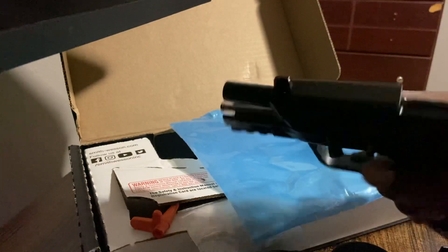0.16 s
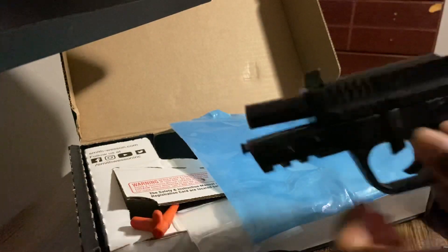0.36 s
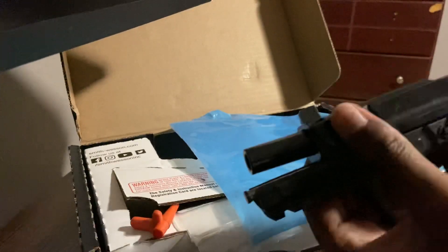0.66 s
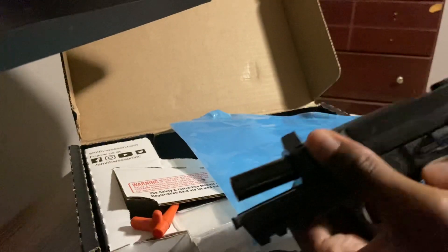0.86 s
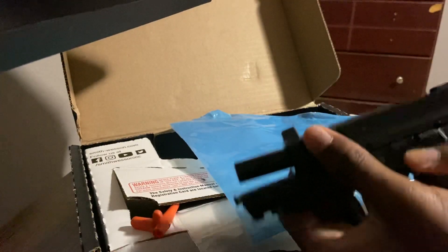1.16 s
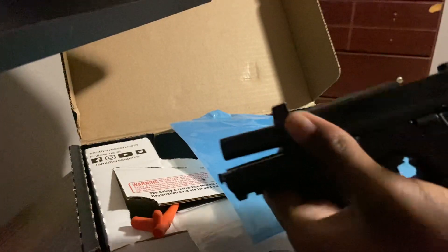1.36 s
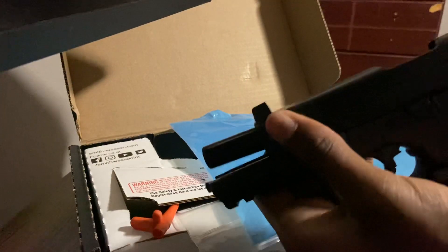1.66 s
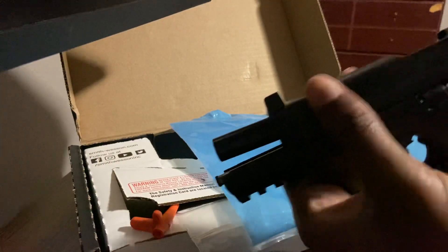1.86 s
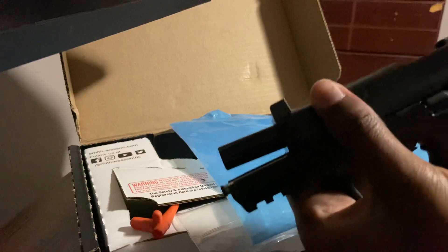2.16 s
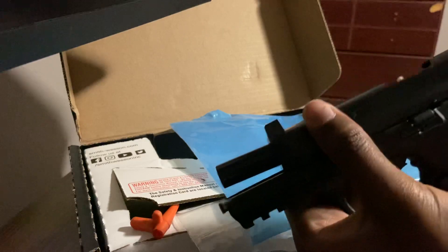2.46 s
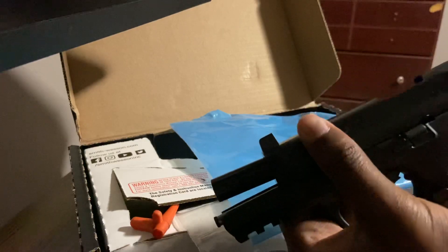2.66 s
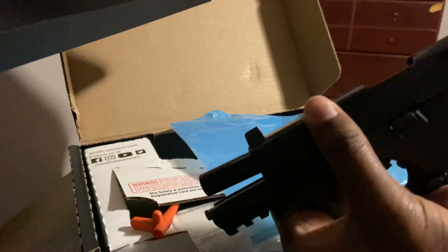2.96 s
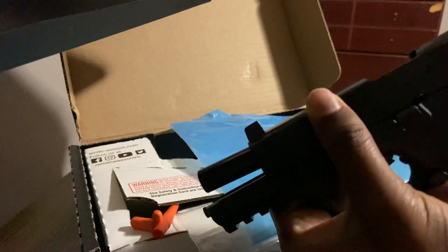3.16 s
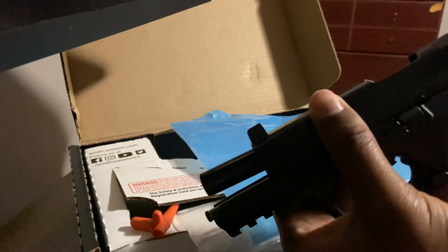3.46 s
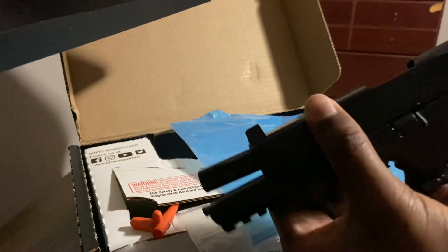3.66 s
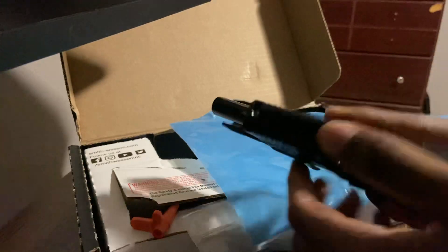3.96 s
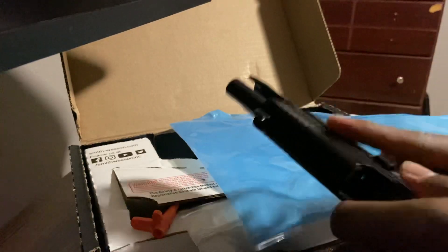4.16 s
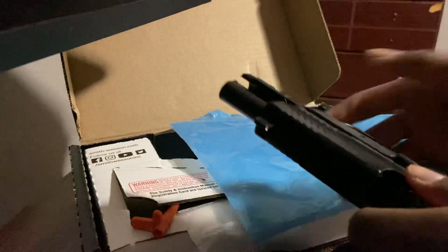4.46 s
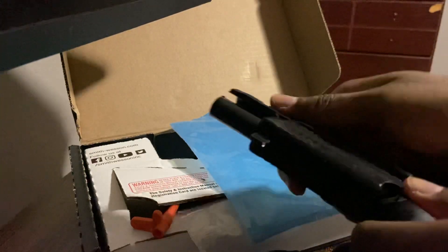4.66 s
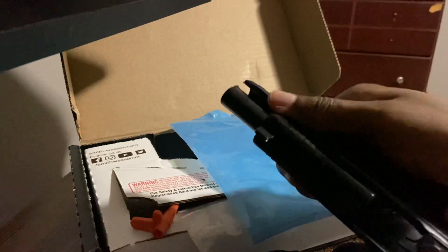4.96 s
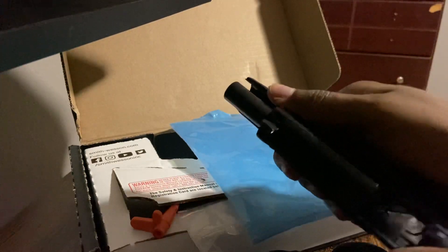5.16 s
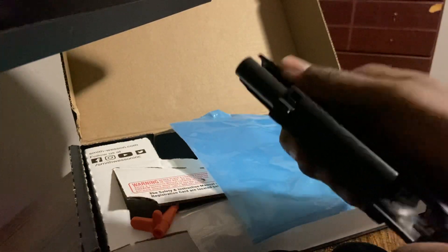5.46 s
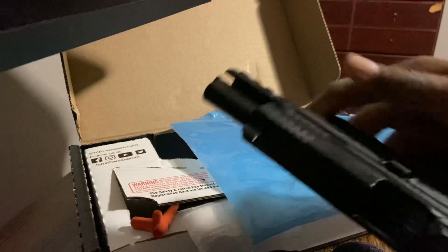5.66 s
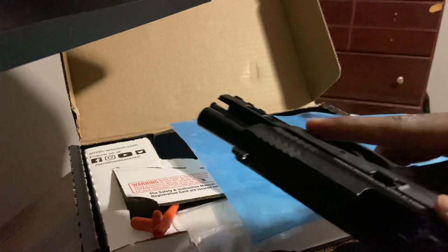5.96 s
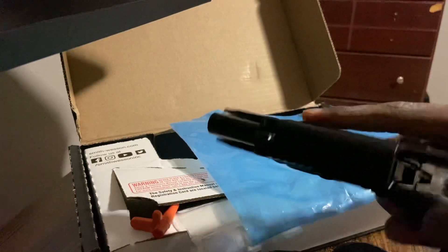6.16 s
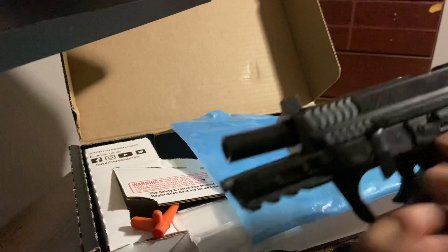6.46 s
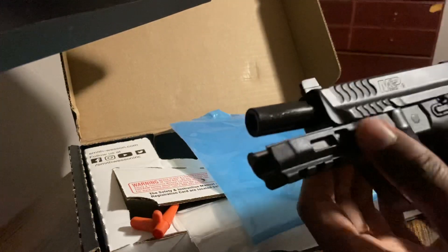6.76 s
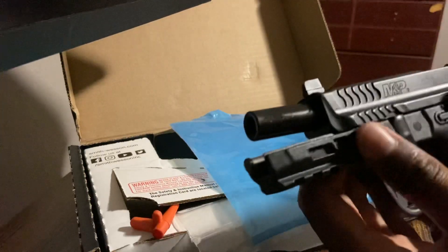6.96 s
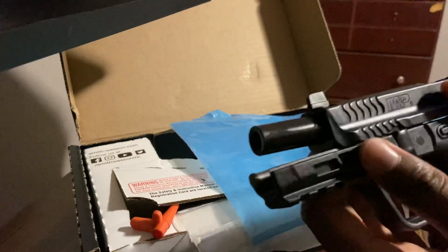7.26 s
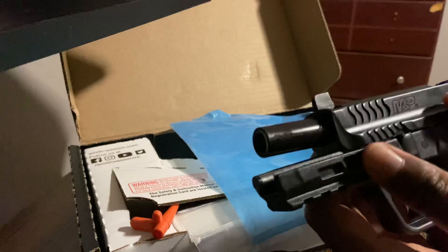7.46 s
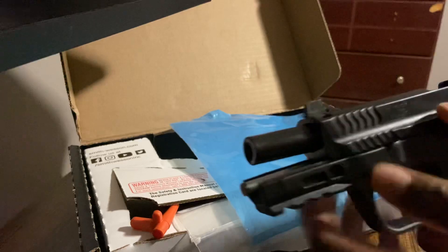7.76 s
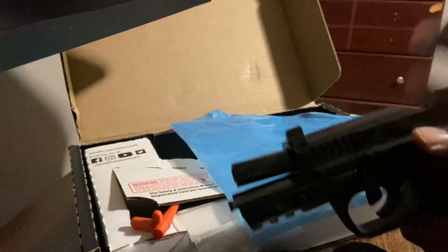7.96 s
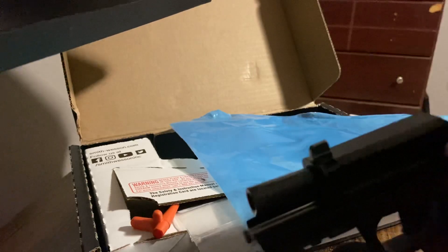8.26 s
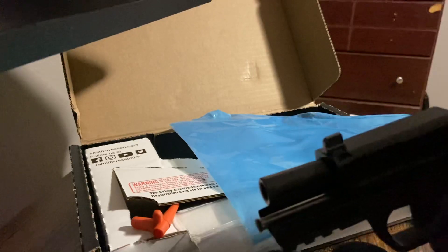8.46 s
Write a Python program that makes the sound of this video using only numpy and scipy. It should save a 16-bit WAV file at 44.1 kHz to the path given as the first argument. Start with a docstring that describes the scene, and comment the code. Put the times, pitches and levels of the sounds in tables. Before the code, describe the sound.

Hands turn and handle a polymer-framed pistol up close, with small clicks and skin rubs over faint fan hum, ending in one very loud slide snap.

```python
"""Hands turn a polymer-framed pistol over a desk, close to a two-port phone microphone.
Parts click as short contacts that ring the frame, and the slide snaps at the end.
Skin rubs over the frame as uneven noise that rings the same modes and hisses on its own.
A few soft knocks ring the desk; wandering fan tones hum over shaped noise in a small room."""
import sys
import numpy as np
from scipy import signal
from scipy.fft import rfft, irfft, next_fast_len
from scipy.io import wavfile
from scipy.ndimage import map_coordinates

SR = 44100
rng = np.random.default_rng(int(sys.argv[2]) if len(sys.argv) > 2 else 0)


def wrap_up_sound(samples):
    """Save the sound to the file named by the first command line argument, as 16-bit audio."""
    columns = np.atleast_2d(samples).T
    # keep every value between -1 and 1, then stretch to whole-number steps
    tamed = np.clip(columns, -1, 1)
    steps = np.round(tamed * 32767).astype(np.int16)
    wavfile.write(sys.argv[1], SR, steps)


N = 380141
APART = np.array([[1], [-1]])  # sign of what differs between left and right


def undb(db):
    """Decibels to amplitude."""
    return 10 ** (np.asarray(db) / 20)


def level(x, db):
    """Scale a sound to an rms level."""
    return x * undb(db) / np.sqrt(np.mean(x ** 2))


def band(x, lo_hz, hi_hz, order=2):
    """Keep only the sound between two frequencies."""
    edges_hz = [lo_hz, min(hi_hz, .45 * SR)]
    return signal.sosfilt(signal.butter(order, edges_hz, "bandpass", fs=SR, output="sos"), x)


def ring(x, hz, t60_s):
    """One decaying mode driven by x; small parts radiate no bass."""
    radius = np.exp(-np.log(1000) / (t60_s * SR))
    angle = 2 * np.pi * hz / SR
    return signal.lfilter([.5, 0, -.5], [1, -2 * radius * np.cos(angle), radius * radius], x)


def pan(x, left_minus_right_db):
    """Raise one side by half the difference and lower the other by as much."""
    return x * undb(np.array([[left_minus_right_db], [-left_minus_right_db]]) / 2)


def walk(rate_hz, count=N):
    """Random levels joined by straight lines, rate_hz of them a second; spread near 1."""
    points = int(count * rate_hz // SR + 2)
    place = np.arange(count) * (rate_hz / SR)
    return 1.198 * np.interp(place, np.arange(points), rng.standard_normal(points))


# Fan tones: pitch_hz, pitch_wander_hz, level_wander_db, change_rate_hz, level_db (rms),
# alike (likeness of left and right, 0 to 1)
FAN_TONES = [(197.2, 2.003, 3, 8.7, -50, 0.99), (720, 16, 1.5, 60, -72.5, 0.051),
             (139.4, 4.98, 2, 15, -66.5, 0.83), (248.8, 5.05, 4.0, 15, -64.5, 1),
             (324, 7, 5, 20, -67, 0.54), (393.5, 5, 5.5, 15, -71.5, 0.42)]


def fan_hum():
    """Fan tones wander a little in pitch, and their level dips further than it rises."""
    out = 0
    for pitch_hz, wander_hz, wander_db, rate_hz, level_db, alike in FAN_TONES:

        def tone():
            swell = undb(wander_db * np.minimum(walk(rate_hz), .6))
            return swell * np.sin(2 * np.pi * np.cumsum(pitch_hz + wander_hz * walk(rate_hz)) / SR)

        alike = np.clip(alike, 0, .99)
        both = np.sqrt(1 + alike) * tone()
        differing = APART * np.sqrt(1 - alike) * tone()
        out = out + level(both + differing, level_db)
    return out


def pair(alike):
    """Spectra of a left and a right noise that are alike by the given share."""
    mid, side = rfft(rng.standard_normal((2, N)))
    alike = np.clip(alike, -.99, .99)
    return np.sqrt(1 + alike) * mid + APART * np.sqrt(1 - alike) * side


# Colour of the room noise: freq_hz, density_db (relative, per Hz)
AIR_COLOUR = [(25, -30), (40, -12.5), (52, -2.5), (80, -10.5), (199, -7.5), (283, -14), (393, -18),
              (642, -25.5), (1240, -31.5), (1700, -39.5), (2100, -47.5), (7280, -63), (12000, -65.5),
              (16500, -83.5)]
# Stereo width of the room noise: freq_hz, alike (likeness of left and right, -1 to 1)
AIR_WIDTH = [(60, 0.93), (200, 0.95), (380, 0.47), (700, 0.017), (1400, -0.003), (3000, 0.47), (6000, 0.34),
             (9000, 1)]


def room_air():
    """Rumble and hiss of the room, noise coloured and widened by frequency."""
    hz = np.fft.rfftfreq(N, 1 / SR) + 1e-3

    def read(table):
        table_hz, value = np.transpose(table)
        return np.interp(np.log(hz), np.log(table_hz), value)

    noise = irfft(pair(read(AIR_WIDTH)) * undb(read(AIR_COLOUR)), N)
    return level(noise, -51.5)


ROOM_DB, ROOM_T60_S, ROOM_RISE_S = -34, 0.35, 0.005
TREBLE_SHARE = .65  # of the room's decay time


def room(feed):
    """Wall echoes that thicken and fade, the treble first."""
    t = np.arange(SR // 2) / SR
    both, apart = rng.standard_normal(len(t)), rng.standard_normal((2, len(t)))
    rise = 1 - np.exp(-(t / ROOM_RISE_S) ** 2)
    middle = band(0.76 * both + 0.59 * apart, 700, 7000) * undb(-60 * t / ROOM_T60_S)
    treble = band(both + .1 * apart, 5700, 16000) * undb(-60 * t / (TREBLE_SHARE * ROOM_T60_S))
    tail = (middle + undb(-6.0) * treble) * rise
    return undb(ROOM_DB) * signal.fftconvolve(feed[None], tail, axes=1)[:, :N]


# Knocks on the desk: start_s, peak_db (before panning), left_minus_right_db
KNOCKS = [(0.54, -48.5, 1), (4.439, -44, 8), (6.136, -28.5, -4)]
# Modes of the desk top: pitch_hz, level_db (relative), t60_s
DESK_MODES = [(145.4, 3.5, 0.58), (221.6, 12, 0.15), (247, -6, 0.22), (352, 3, 0.18), (500, -18, 0.18),
              (772, 1, 0.086), (866, -16, 0.18)]


def desk_knocks():
    """A soft noisy push, up in milliseconds and gone in tens of them, rings the desk top."""
    out, t = np.zeros((2, N)), np.arange(16384) / SR
    for start_s, peak_db, pan_db in KNOCKS:
        push = rng.standard_normal(len(t)) * np.exp(-t / 0.025) * np.minimum(t / 0.0033, 1)
        thud = sum(level(ring(push, hz, t60_s), db) for hz, db, t60_s in DESK_MODES)
        i = int(start_s * SR)
        out[:, i:i + len(t)] += pan(thud * undb(peak_db) / abs(thud).max(), pan_db)
    return out


# Modes of frame and slide held in the hand, for rubs and clicks alike:
# pitch_hz, level_db (relative), decay_s (nominal: each contact shortens it)
PISTOL_MODES = [(725, -4.5, 0.14), (938, 6.5, 0.01), (1200, 2.5, 0.014), (1540, 2.5, 0.012),
                (1734, 10, 0.0094), (2144, 7.5, 0.0061), (2520, 1.5, 0.024), (2990, 1.5, 0.011),
                (3520, 4, 0.0088), (4017, -0.5, 0.014), (4470, -1.5, 0.0087), (4960, -6.5, 0.017),
                (5270, 2, 0.0068), (6080, -1.5, 0.0095), (6940, 0.5, 0.015), (7760, -3.5, 0.022)]
# Finger strokes over the frame: full_pressure_s (start of the hold), rise_s, hold_s, fade_s,
# ring_db, loudest_hz, fall_db (per octave away from the loudest), hiss_db
STROKES = [(0.0, .01, 0.34, 0.086, -69.5, 3830, 1.5, -73.5),
           (0.552, 0.064, 0.021, 0.07, -63.5, 1300, 2, -66.5),
           (1.128, 0.0057, 0.025, 0.049, -61.5, 1720, -3, -64.5),
           (1.167, 0.019, 0.047, 0.052, -69.5, 1900, 2, -71),
           (1.239, 0.023, 0.024, 0.023, -62, 4710, 9, -75),
           (1.288, 0.0099, 0.055, 0.03, -59.5, 5300, 2, -69),
           (1.355, .02, .05, 0.034, -59.5, 6500, 2.5, -69),
           (1.362, 0.058, 0.048, 0.035, -56, 1690, 28, -70),
           (1.54, 0.095, 0.021, 0.066, -61.5, 1560, 1.5, -73.5),
           (1.83, 0.058, 0.057, 0.071, -65.5, 1560, 2, -68), (2.352, 0.0047, .003, 0.02, -74, 2600, 9, -79),
           (2.383, 0.067, .003, 0.09, -75, 1390, -1, -100),
           (2.854, 0.027, 0.0097, 0.095, -65.5, 1300, -0.5, -64),
           (3.722, 0.063, 0.043, 0.099, -59, 1590, 0, -61), (3.749, 0.018, 0.03, .02, -61.5, 4100, 12, -72),
           (3.856, 0.095, .003, 0.083, -73, 1390, 4, -74), (3.964, 0.046, 0.0175, 0.4, -71, 1290, 0, -72),
           (4.147, 0.018, 0.038, 0.038, -68.5, 3100, 16, -80),
           (4.189, 0.0074, 0.049, 0.054, -66.5, 5000, 1, -76),
           (4.272, 0.095, 0.048, 0.18, -64, 2270, 11, -67.5),
           (4.312, 0.056, 0.073, 0.034, -58, 3600, -2, -71),
           (4.435, 0.054, 0.0027, 0.11, -63, 1300, 1, -62.5),
           (4.502, 0.019, 0.023, 0.059, -60, 3520, 1.5, -60.5),
           (4.533, 0.03, 0.024, 0.15, -64, 2320, 0, -68.5),
           (4.702, 0.041, 0.035, 0.056, -61.5, 3770, 18, -64),
           (4.71, 0.032, .04, 0.029, -69, 5200, 16, -80), (4.786, 0.021, 0.057, 0.03, -64, 7130, 4.5, -71),
           (4.849, 0.032, 0.067, 0.05, -63.5, 4070, 8, -63.5),
           (4.956, 0.051, 0.05, 0.064, -66, 1720, 6, -76),
           (5.028, 0.11, 0.004, 0.11, -57.5, 2660, 2.5, -64),
           (5.143, .02, 0.045, 0.035, -69, 3640, 14, -80), (5.191, 0.049, 0.0089, 0.028, -71, 1700, 6, -78),
           (5.268, 0.073, .003, 0.064, -69, 1290, 1, -85), (5.473, 0.18, .003, 0.025, -76, 3400, -1, -88),
           (5.489, 0.004, 0.0028, 0.02, -52.5, 3600, 42, -72),
           (5.511, 0.021, 0.058, 0.018, -67, 3860, 0, -71),
           (5.563, 0.017, 0.084, 0.043, -53.5, 1530, 12, -63.5),
           (5.626, .05, 0.056, 0.07, -53, 2520, 4.5, -57), (5.833, 0.029, 0.084, 0.065, -67, 2350, 12, -88),
           (5.867, 0.015, 0.047, 0.083, -69.5, 3900, -3, -69),
           (6.072, .04, 0.047, 0.019, -67, 2200, 23, -70), (6.119, 0.16, 0.015, 0.35, -62.5, 1740, 1, -69),
           (6.136, 0.0098, .003, 0.1, -44.5, 4670, 4, -77.5),
           (6.16, 0.018, 0.039, 0.056, -52.5, 2750, 18, -80),
           (6.417, 0.081, 0.0025, 0.095, -62, 2414, 6, -77),
           (6.459, 0.0037, 0.016, 0.034, -76, 6850, 38, -98),
           (6.458, 0.045, 0.0032, 0.034, -68, 1940, 15, -98), (6.61, 0.11, .003, 0.24, -74.5, 2130, 2, -79),
           (6.904, 0.026, 0.0026, 0.075, -65.5, 2480, 7, -83),
           (7.127, 0.05, 0.0021, 0.14, -78, 1300, 9, -67),
           (7.716, 0.11, 0.0029, 0.085, -75.5, 1300, 0, -80.5),
           (8.113, 0.18, 0.025, 0.33, -76, 1835, 3, -93), (8.492, 0.19, 0.0027, .012, -77.5, 2080, 14, -97),
           (8.559, 0.0094, 0.0023, .002, -38, 2090, 24, -70),
           (8.583, .015, .015, 0.034, -32.5, 2670, 14, -60)]
RUBBED_PART = (2.7, .012)  # the touched part rings at its own pitch: level_db, nominal decay_s
RUB_FALL_DB = 13.5  # distance from the loudest pitch weakens a mode by no more than this
GRIP_SHIFT, GRIP_GLIDE = .025, .03  # shares: detuning of each mode, and common bend of all
RAMP_DB = 20  # change of the ring over one rise or fade time
HISS_STEEPER = 1.67  # the hiss follows pressure this many times as steeply
SCRAPE_DB, SCRAPE_OCTAVES = -11, 1.2  # unpitched scrape and its reach either side of the loudest


def skin_rubs():
    """Skin slips as rough, uneven noise that rings the frame and hisses on its own."""
    out = np.zeros((2, N))
    for full_s, rise_s, hold_s, fade_s, ring_db, loudest_hz, fall_db, hiss_db in STROKES:
        first = max(int((full_s - 2 * rise_s) * SR), 0)
        last = min(int((full_s + hold_s + 2 * fade_s) * SR), N)
        i = np.arange(first, last)
        count = len(i)
        corners_s = [-2 * rise_s, 0, hold_s, hold_s + 2 * fade_s]
        press_db = RAMP_DB * np.interp(i / SR - full_s, corners_s, [-2.0, -0.033, -0.11, -2.0])

        def slips(rough_db):
            unevenness = walk(250, count) + .7 * walk(50, count)
            return rng.standard_normal(count) * undb(rough_db * unevenness)

        drive = slips(2.0) + 0.44 * APART * slips(2.6)
        frame, power = 0, 0
        for hz, db, decay_s in PISTOL_MODES + [(loudest_hz, *RUBBED_PART)]:
            gain = undb(db - min(abs(fall_db * np.log2(hz / loudest_hz)), RUB_FALL_DB))
            hz = hz * (1 + GRIP_SHIFT * rng.standard_normal())
            # the shifting grip frees now one mode, now another
            free = undb(2.2 * walk(25, count))
            mode = ring(ring(drive, hz, 0.43 * decay_s), hz, 0.43 * decay_s)
            frame = frame + gain * free * level(mode, 0)
            power = power + gain ** 2
        # reading the ring unevenly fast bends every mode together as the hand moves
        place = np.cumsum(1 + GRIP_GLIDE * walk(30, count))
        frame = np.array([map_coordinates(side, [place], mode="mirror") for side in frame])
        frame = frame / np.sqrt(power)
        reach = 2 ** SCRAPE_OCTAVES
        scrape = band(drive, max(loudest_hz / reach, 1100), min(loudest_hz * reach, 8200))
        frame = frame + level(scrape, SCRAPE_DB)
        skin = band(slips(3.3), 8200, 16000) + undb(1.5) * band(slips(1.4), 9200, 15000)
        out[:, i] += pan(frame * undb(ring_db + press_db), 0.62)
        out[:, i] += undb(HISS_STEEPER * press_db) * level(skin, hiss_db)
    return out


# Parts that meet: start_s, level_db (nominal), loudest_hz, below_db and above_db (fall per octave
# below and above the loudest), crack_db (relative), left_minus_right_db, second_hz and second_db
# (second pitch of the struck part, relative), length (share of a plain click)
CLICKS = [(0.1776, -49, 2240, 17, 28, -31, 4.5, 3000, -25, 1.2),
          (0.3418, -39.5, 3730, -3.5, 17.2, -36, 3, 1300, -3, 0.84),
          (0.5325, -51, 1500, 0, 2.3, -22, 3.1, 3000, -10, .7),
          (1.1313, -45.5, 1650, 20, 3.1, -16, 2.78, 5000, -6, 0.6),
          (1.2044, -52, 2370, 6, 9.1, -25, 4, 5000, -15, 0.99),
          (1.295, -43.5, 7530, 2, 4, -11.5, 11, 1650, 7, .7),
          (1.348, -50, 1900, 20, 15, -31, 3, 5000, -15, .9),
          (1.355, -45, 1600, 15, 6, -31, 3, 6000, -10, .9),
          (1.377, -42, 1700, 20, 20, -31, 3, 5400, -6, .9),
          (1.393, -52, 1900, 15, 20, -31, 3, 6000, -15, .9),
          (1.863, -60, 7280, -1, 2.1, -2, 0, 3000, -10, .9),
          (2.3801, -42.5, 1590, 37, 88, -60, 2, 2700, -22, .9),
          (2.509, -71, 7280, 11, 3, -12, -2, 3000, -22, .9),
          (2.8494, -66, 1380, -2, 2.1, -9, 1.1, 3000, -10, .9),
          (3.2166, -39.5, 1474, 12, 100, -55, 3.5, 2750, -13.5, 1.05),
          (3.6562, -50, 7200, 4.5, 1.8, -12, 1, 3000, -15, 0.68),
          (3.694, -47.5, 7280, -2, 2.1, -13, 1.1, 3000, -10, .9),
          (3.7265, -40, 1550, 18, 3.2, -20, 2, 4000, -8, .8),
          (3.845, -44, 1460, 2, 6.3, -30, 0, 4800, -5, 0.9),
          (4.09, -60, 5510, 2, 27, -21, 10, 3000, -10, .9),
          (4.2298, -28, 4100, 1, 25, -37, 2.5, 1200, 2, 0.82),
          (4.436, -57, 1790, 4, 4, -6, 0, 5000, -10, .9), (4.59, -57, 3700, 12, 12, -20, 5, 7500, -2, .9),
          (4.6178, -53, 2400, 10, 8, -20, 5, 7300, -6, 0.98),
          (4.796, -45.5, 7000, 6, 2.1, -30, 5, 3300, 0, .7),
          (5.0859, -42, 1530, 3, 29, -37.5, -2, 2000, -10, 1.1),
          (5.1, -60, 4520, 8, 4, -20, 3, 3700, -5, .9), (5.1347, -54, 5160, 10, 10, -13, 9, 3700, -5, .9),
          (5.452, -57, 3200, 19, 12.4, -24, 5, 5000, -20, .9),
          (5.467, -58, 3000, 15, 20, -30, 3, 5000, -20, .9),
          (5.486, -51, 3800, 14, 7.4, -28, 10, 6000, -15, 0.82),
          (5.5605, -46, 1600, 13, 2.2, -16, 6, 5000, -10, 1.2),
          (5.621, -46, 1500, 11, 4, -18, 0, 5000, -10, 0.99),
          (6.1324, -20.5, 5300, 4, 15, -31, 3, 2940, 2.5, 0.39),
          (6.1378, -32, 2800, 10, 15, -35, 2, 1490, -3, .8),
          (6.1415, -42, 5600, 10, 8, -35, 3, 7300, -3, .6),
          (6.145, -34, 1200, 5, 10, -35, 0, 4500, -10, .9),
          (6.219, -45, 1800, -3, 6.9, -26, 7, 3300, -5, 0.97),
          (6.2739, -36.5, 2350, 25, 60, -48, 1, 3800, -17, 1.2),
          (6.4584, -34, 1160, 3, 5.8, -46, 0, 6800, -8, 1),
          (6.6088, -60.5, 7280, 3, 2.14, -10, 6, 3000, -10, .9),
          (6.7792, -60, 1191, 3, 4.6, -16, 1, 5000, -11, .9),
          (6.895, -60, 2390, 1, 8.2, -40, -1.1, 5000, -10, .9),
          (8.138, -63.5, 6270, 18.5, 20, -26, 0, 3000, -20, .9),
          (8.245, -67, 5170, 14.5, 8, -20, 2, 3000, -20, .9),
          (8.36, -68, 6700, 14.5, 22, -23, 1, 3000, -20, .9),
          (8.462, -59, 2100, 12, 20, -37, 2, 3000, -20, .9),
          (8.482, -67, 4100, 15, 8, -25, 5, 5700, -5, .9),
          (8.51, -39.5, 2190, -1, 3.8, -22.5, 3.5, 7200, -3, .8),
          (8.517, -28.5, 2300, -2.5, 7.1, -21, 1, 7070, -6, 0.78),
          (8.5385, -18.5, 1650, 12, 4.4, -28, 5, 4170, -2, 0.84),
          (8.562, -1, 2120, 10, 2.7, -17, 4, 3490, -2, .8),
          (8.5705, -16, 2100, 8, 6.6, -30, -8, 4000, -5, .9),
          (8.578, -28, 1910, 12, 8, -30, 0, 3900, -3, .9), (8.583, -26, 2100, 12, 8, -30, 0, 4000, 0, .9),
          (8.591, -24, 2800, 17, 8, -30, 0, 5800, 4, 0.73),
          (8.597, -29, 2700, 12, 8, -30, 0, 4200, -3, 0.8),
          (8.6164, -29, 2240, 14, 4, -6, -3, 6500, -5, .9)]
STRUCK_PART = (2.3, 0.016)  # the struck part rings at its own pitches: level_db, nominal decay_s
CONTACT_S, RISE_S = 0.0013, 0.00058  # fade and rise of a plain contact
FIRST_TOUCH = 5.8  # spike of the first touch, against chatter of spread 1
UNEVEN_DB = 3.5  # each mode radiates more to one side or the other
TO_WALLS_DB = -1  # share of a click that reaches the walls


def part_clicks():
    """A contact chatters a millisecond or so and rings the modes; returns near sound and room feed."""
    out, t = np.zeros((3, N + 1536)), np.arange(1536) / SR
    for (start_s, level_db, loudest_hz, below_db, above_db, crack_db, pan_db,
         second_hz, second_db, length) in CLICKS:
        envelope = np.minimum(t / (RISE_S * length), 1) * np.exp(-t / (CONTACT_S * length))
        chatter, aside = rng.standard_normal((2, len(t))) * envelope
        chatter = chatter + FIRST_TOUCH * (t == t[12])
        drive = chatter + .2 * aside * APART
        body = 0
        for hz, db, decay_s in PISTOL_MODES + [(loudest_hz, *STRUCK_PART), (second_hz, *STRUCK_PART)]:
            slope_db = max(above_db if hz > loudest_hz else below_db, 0)
            fall_db = slope_db * abs(np.log2(hz / loudest_hz))
            db += second_db if hz == second_hz else -fall_db
            mode = ring(ring(drive, hz, 0.76 * length * decay_s), hz, 0.56 * length * decay_s)
            body = body + pan(level(mode, db), UNEVEN_DB * rng.standard_normal())
        body = level(body, -21.0)
        crack = band(chatter, 5600, 15000) + 1.06 * band(chatter, 14200, 16500)
        crack = level(crack + .6 * band(chatter, 11240, 12600), crack_db - 10.5)
        # the walls hear the parts from all sides, where single modes stand out less
        low_hz = loudest_hz / 2 ** (6 / max(below_db, 3))
        high_hz = loudest_hz * 2 ** (8 / max(above_db, 4))
        spread = level(band(aside, low_hz, high_hz), -29.5)
        feed = (.5 * body[0] + 2.0 * crack + spread) * undb(TO_WALLS_DB)
        i = int(start_s * SR)
        out[:, i:i + len(t)] += undb(level_db) * np.vstack([pan(body, pan_db) + crack, feed])
    return out[:2, :N], out[2, :N]


def scene():
    """Fan and air behind, desk and walls around, skin and clicking parts in front."""
    background = pan(room_air() + fan_hum(), -0.75)
    skin = skin_rubs()
    parts, feed = part_clicks()
    echoes = room(feed + undb(-10.0) * skin.mean(axis=0))
    return background + desk_knocks() + echoes + skin + parts


# Phase between the two microphone ports: freq_hz, left_lead_rad
PORTS = [(0, 0), (7400, 0), (8900, -3.14), (13100, -9.4), (15800, -13.2), (22050, -22)]
CEILING, TOP_HZ = .99, 16000  # full scale is 1


def record(dry):
    """The treble reaches the two ports out of step; the loudest peaks are rounded; the top is cut."""
    size = next_fast_len(N + 4096)
    lead = np.interp(np.fft.rfftfreq(size, 1 / SR), *np.transpose(PORTS))
    turn = np.exp(.5j * np.array([lead, -lead]))  # half the lead on each side
    turned = irfft(rfft(dry, size) * turn, size)[:, :N]
    rounded = turned / (1 + (turned / CEILING) ** 4) ** .25
    return signal.sosfilt(signal.ellip(10, .2, 70, TOP_HZ, fs=SR, output="sos"), rounded)


dry = scene()
out = record(dry)
wrap_up_sound(out)
```